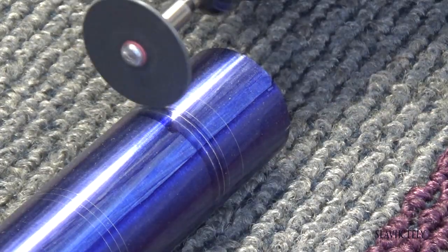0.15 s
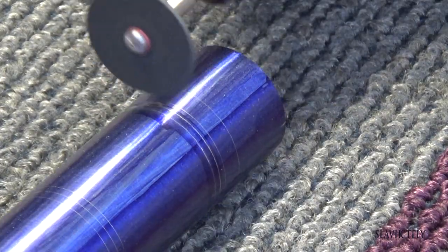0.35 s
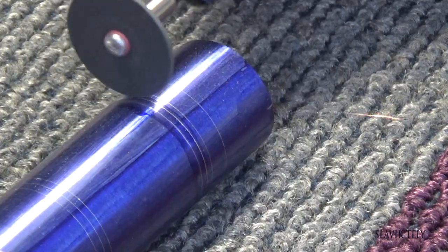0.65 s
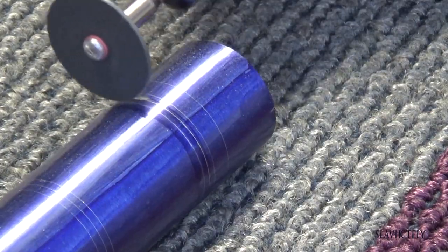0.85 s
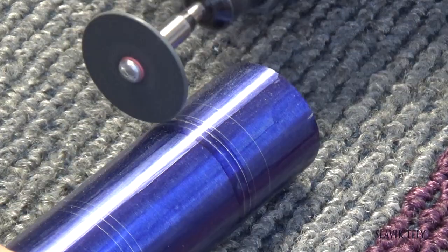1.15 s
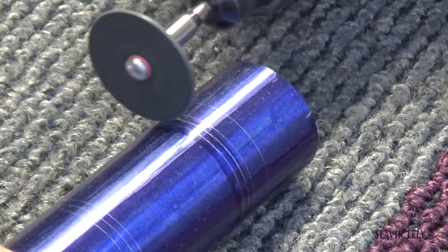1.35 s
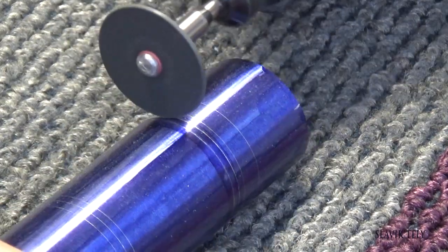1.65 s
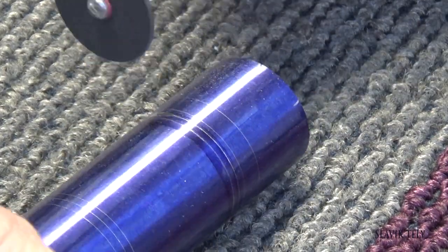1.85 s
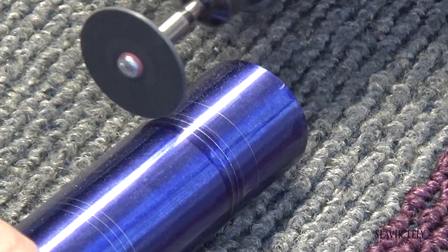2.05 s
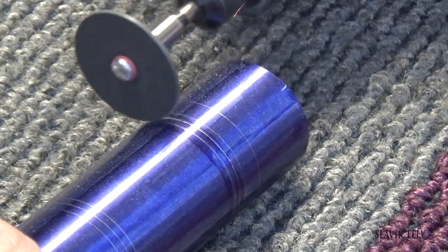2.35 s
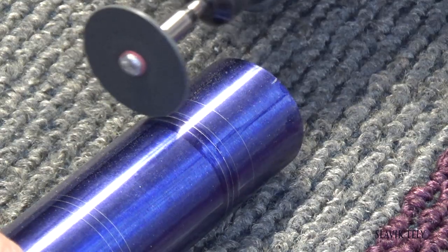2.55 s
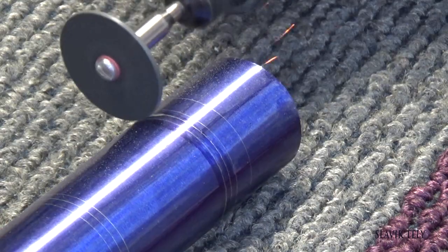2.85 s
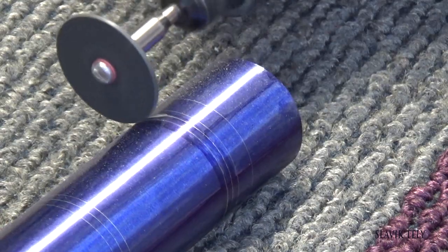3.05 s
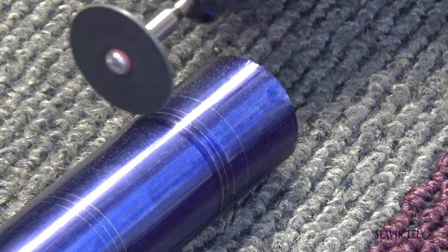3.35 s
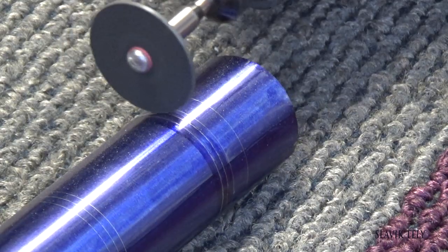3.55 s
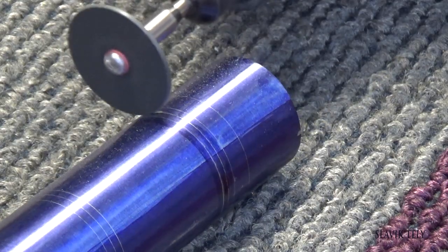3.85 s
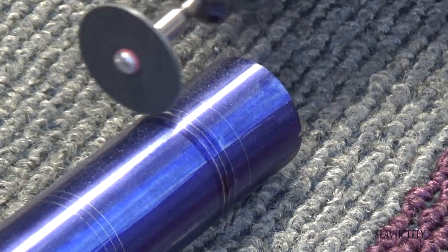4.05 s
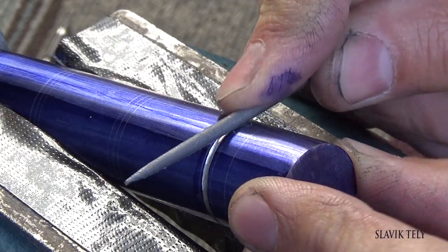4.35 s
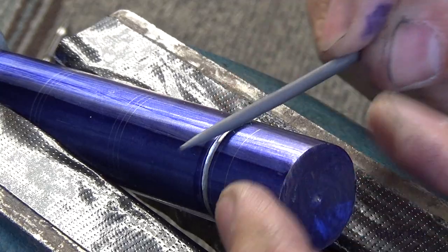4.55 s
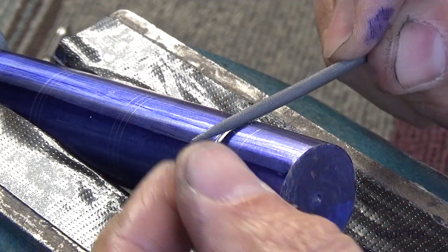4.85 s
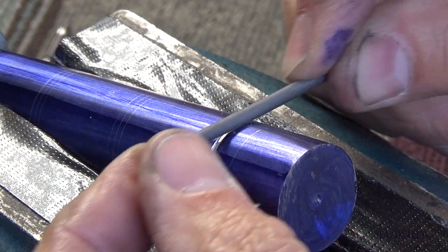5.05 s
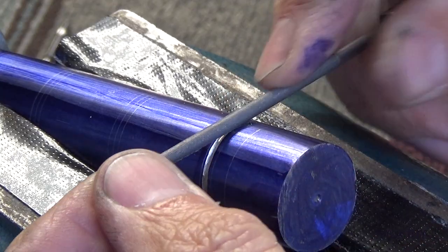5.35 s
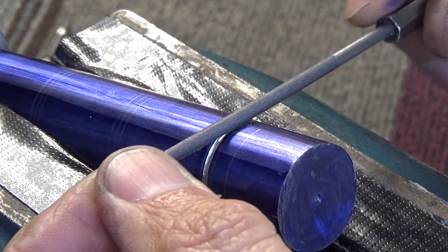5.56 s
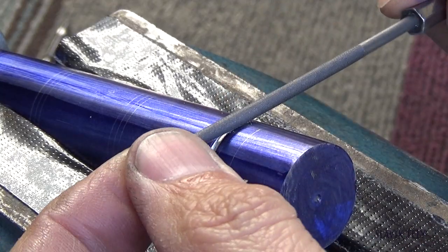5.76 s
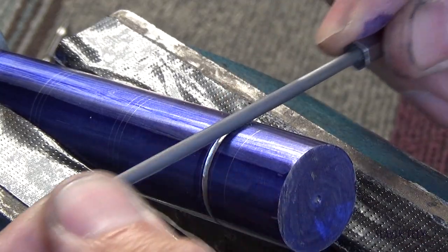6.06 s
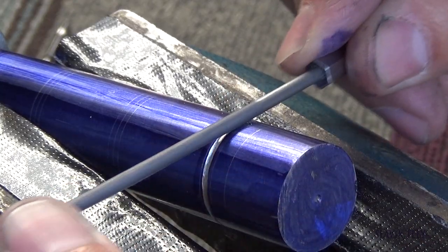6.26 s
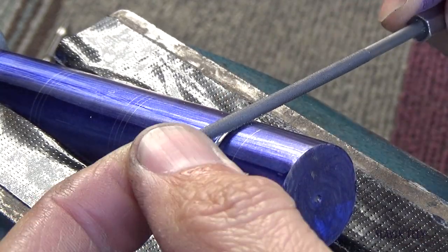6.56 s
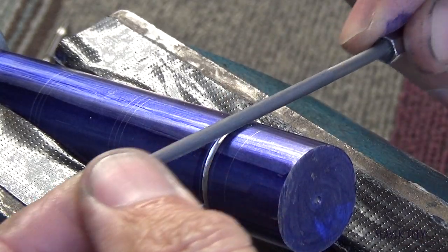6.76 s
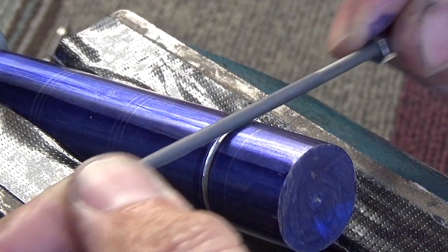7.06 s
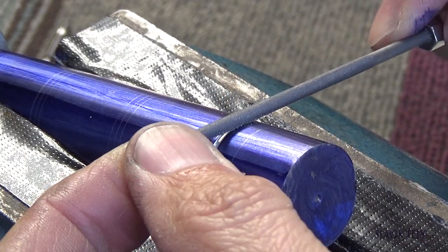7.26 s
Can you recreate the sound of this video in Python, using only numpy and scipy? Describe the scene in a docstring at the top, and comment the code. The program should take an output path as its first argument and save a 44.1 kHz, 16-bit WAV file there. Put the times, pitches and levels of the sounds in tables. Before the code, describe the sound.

Shrill, wavering motor whine with gritty disc grinding on steel, then a sudden cut to soft dry file scratches, bright metallic ticks and dull taps.

```python
"""Workshop, two benches: a small rotary tool cuts grooves in a steel bar, then a thin round file works the groove.
Tool: shaft orders and bearing tones follow a load-sagging shaft; the disc drives resonances once a turn, over hiss.
File: coloured noise scratches and snaps; taps mix a noise crack, a thud and decaying steel modes, over a rumble.
All dB levels are before a final port trim of +0.25 and -0.25 dB; spectra in dB per Hz are relative."""
import sys
import numpy as np
from scipy import signal
from scipy.fft import rfft, irfft
from scipy.io import wavfile
from scipy.ndimage import uniform_filter1d

SR = 44100
rng = np.random.default_rng(int(sys.argv[2]) if len(sys.argv) > 2 else 0)


def dump_mix(stems):
    """Bounce the given channels to the path in sys.argv[1] as a 16-bit WAV at rate SR."""
    frames = np.atleast_2d(stems).T  # one column per channel
    limited = np.clip(frames, -1, 1)  # hard clip at full scale
    pcm = np.round(limited * 32767).astype(np.int16)
    wavfile.write(sys.argv[1], SR, pcm)


N = 325899
TOOL_END_S = 4.205  # the tool bench ends, the file bench begins


def amp(db):
    """Turns dB into gain."""
    return np.exp(np.asarray(db) * (np.log(10) / 20))


def evened(x):
    """Scales to an rms of one."""
    return x / np.sqrt(np.mean(x ** 2) + 1e-20)


def read_spectrum(points, hz):
    """Reads a spectrum on a log-frequency axis."""
    point_hz, value = np.transpose(points)
    return np.interp(np.log(hz + 1), np.log(point_hz + 1), value)


def columns(rows, t):
    """Samples every column of a curve table at the times t."""
    time_s, *values = np.transpose(rows)
    return [np.interp(t, time_s, v) for v in values]


def spell(t, start_s, length_s, ramp_s):
    """Rises over ramp_s, holds, and fades over ramp_s."""
    to_edge_s = np.minimum(t - start_s, start_s + length_s - t)
    return np.sin(np.pi / 2 * np.clip(to_edge_s / ramp_s, 0, 1)) ** 2


def drift(n, rate_hz, step=1):
    """Random wander from one-pole smoothed knots (corner rate_hz), read every step samples."""
    knots_hz = 200
    knots = rng.standard_normal(int(n / SR * knots_hz) + 2)
    smooth = signal.lfilter([1], [1, -np.exp(-2 * np.pi * rate_hz / knots_hz)], knots)
    return np.interp(np.arange(0, n, step) / SR * knots_hz, np.arange(len(knots)), evened(smooth))


def resonate(x, hz, width_hz):
    """One complex-pole resonance, gain near one at hz."""
    r = np.exp(-np.pi * width_hz / SR)
    pole = r * np.exp(2j * np.pi * hz / SR)
    return 2 * signal.lfilter([1 - r], [1, -pole], x + 1e-18).real


def noise(n, spectrum, patchy_db):
    """Noise of a given colour with drifting patches in time and frequency, rms one."""
    frames, hz = n // 128 + 5, np.fft.rfftfreq(512, 1 / SR)
    real, imag, patches = rng.standard_normal((frames, 257, 3)).T
    patches = uniform_filter1d(patches, size=8, axis=0)
    patches = evened(uniform_filter1d(patches, size=10, axis=1))
    z = (real + 1j * imag) * amp(read_spectrum(spectrum, hz)[:, None] + patchy_db * patches)
    return evened(signal.istft(z, nperseg=512, noverlap=384)[1][:n])


# Shaft speed. Each row: time in seconds, shaft turns in Hz.
SHAFT_SPEED = [(0.0, 310.9), (0.25, 313.7), (0.36, 311.0), (0.62, 301.5), (0.72, 303.0), (1.1, 315.3),
               (1.2, 315.1), (1.32, 313.0), (1.56, 318.8), (1.8, 311.8), (1.92, 310.8), (2.4, 300.6),
               (2.52, 303.2), (2.7, 305.4), (3.0, 301.0), (3.24, 298.7), (3.55, 301.6), (3.72, 303.0),
               (3.84, 301.4), (4.08, 294.2), (4.15, 301.0), (4.19, 302.8)]


def shaft(t, chatter):
    """Integrates the load-sagging speed to turns; chatter jerks the shaft."""
    shaft_hz = columns(SHAFT_SPEED, t)[0]
    jerk_turns = .005 * chatter * evened(uniform_filter1d(drift(len(t), 30.), 400))
    return shaft_hz, np.cumsum(shaft_hz) / SR + jerk_turns


def tone(turns, db, shake):
    """A sine shaken in size and phase; start phases within 0.6 turn bunch the orders into a beat each turn."""
    n = len(turns)
    angle = 2 * np.pi * (turns + .6 * rng.random())
    size, phase = (evened(uniform_filter1d(drift(n, 60.), 260)) for _ in range(2))
    shaken = (1 + shake * size) * np.cos(angle) - shake * phase * np.sin(angle)
    return np.sqrt(2 / (1 + 2 * shake ** 2)) * amp(db) * shaken


# Body resonances lifting orders that pass through. Each row: centre in Hz, width in Hz, lift in dB.
BODY_RESONANCES = [(2515.6, 47, 19), (3890, 150, 12.5)]
# One order sings out as the hand turns the tool; the pitch picks the order.
# Each row: start in seconds, length in seconds, nominal pitch in Hz, surge level in dB rms.
ORDER_SURGES = [(.06, .15, 4375, -30), (0.1, 0.28, 2186, -37.5), (-0.5, 0.21, 2510, -33),
                (0.7, 0.064, 4020, -33), (0.95, 0.23, 3940, -32.5), (0.76, 0.36, 612, -51),
                (0.8, 0.26, 3680, -32.5), (0.5, 0.38, 3040, -39), (0.8, 0.25, 3070, -33.5),
                (0.8, .55, 3350, -44), (0.3, .25, 3980, -36.5), (.78, .2, 2770, -41), (0, 0.5, 5930, -41.5),
                (1.1, .4, 4440, -40.5), (1.9, .42, 2480, -33.5), (1.78, .3, 5910, -39),
                (2.15, 0.83, 3340, -41), (2.5, 0.45, 4840, -39.5), (2.5, .42, 4810, -39),
                (3.35, 0.74, 4820, -41), (3.78, .36, 5060, -43), (3, .25, 5350, -46),
                (3.75, 0.32, 5680, -44), (1.25, 0.19, 2510, -26), (1.362, .07, 3780, -33),
                (1.445, 0.41, 3800, -27), (1.55, 0.13, 3820, -25.5), (1.67, 0.15, 2505, -24),
                (1.8, 0.38, 2175, -33.5), (2, 0.26, 4660, -35), (1.8, .14, 3730, -28.5),
                (2.5, .25, 2105, -39), (2.43, 0.062, 2416, -33), (2, 0.32, 3030, -39.5),
                (2, 0.2, 3640, -35), (2.777, 0.33, 2420, -30.5), (2.85, .14, 3630, -28.5),
                (3, 0.8, 3010, -37), (3, 0.89, 900, -53), (3, 0.25, 4510, -34.5), (3.082, 0.21, 3590, -29),
                (3, 0.28, 3290, -36.5), (4, 0.24, 2410, -39), (3.5, .15, 2110, -39), (4, .1, 3930, -29.5),
                (4, 0.15, 3870, -26), (3.947, 0.15, 2360, -34), (4, 0.11, 2060, -37.5),
                (4.075, 0.06, 3850, -32), (4.09, 0.053, 3600, -32), (4, 0.22, 4470, -36.5),
                (4, 0.17, 4150, -40)]


def order_db(k, db, t, shaft_hz):
    """Level of one shaft order: wandering, lifted by the body, plus its surges."""
    step = 64
    wander = amp(2 * 3 * np.tanh(.7 * drift(len(t), 3., step)))  # power, within 3 dB
    u, turn_hz = t[::step], shaft_hz[::step]
    lift = sum(amp(2 * lift_db) / (1 + (2 * (k * turn_hz - hz) / width_hz) ** 2) ** 2
               for hz, width_hz, lift_db in BODY_RESONANCES)
    power = amp(2 * db) * (wander + lift * wander ** 0.21)
    for start_s, length_s, hz, surge_db in ORDER_SURGES:
        if round(hz / np.interp(start_s + length_s / 2, u, turn_hz)) == k:
            power = power + amp(2 * surge_db) * spell(u, start_s, length_s, 0.3 * length_s) ** 2
    return np.interp(t, u, 10 * np.log10(power))


# Shaft orders. Each entry: multiple of the shaft speed, base level in dB rms.
SHAFT_ORDERS = dict(zip((2, 3, 4, 5, 6, 7, 8, 9, 10, 11, 12, 13, 14, 15, 16, 17, 18, 19, 20, 21, 27),
                (-57, -58, -46, -53, -49, -44, -44, -47, -43, -43, -42, -44, -49, -44, -44, -51, -52, -49, -51, -46, -47)))
# The whine drops out briefly. Each entry: start in seconds.
WHINE_STUTTERS = [1.103, 1.146, 1.392, 1.44, 1.468, 1.498]
STUTTER_S, STUTTER_DB = 0.018, -10.5


def motor_whine(t, turns, shaft_hz, hum_db, chatter, whine_db):
    """Hum at shaft speed and its orders, the higher ones shaken more by chatter."""
    dips = sum(spell(t, start_s, STUTTER_S, STUTTER_S / 2) for start_s in WHINE_STUTTERS)
    whine_db = whine_db + STUTTER_DB * dips
    whine = tone(turns, hum_db, 0.015 * chatter)
    for k, db in SHAFT_ORDERS.items():
        whine += tone(k * turns, whine_db + order_db(k, db, t, shaft_hz), 0.06 * k * chatter)
    return whine


# Bearing tones. Each row: multiple of the shaft speed, base level in dB rms.
BEARING_TONES = [(7.63, -47), (8.396, -36.5), (8.81, -47), (14.52, -54), (16.4, -54)]


def bearings(turns):
    """Sines at non-integer multiples of the shaft, drifting slowly in level."""
    return sum(np.sqrt(2) * amp(db + 1.8 * drift(len(turns), 2.5)) * np.sin(2 * np.pi * k * turns)
               for k, db in BEARING_TONES)


# Disc resonances. Each row: centre in Hz, width of each of two passes in Hz, relative gain in dB.
DISC_MODES = [(6475, 470, 4.5), (6766, 216, 8.5), (7036, 290, 9), (7710, 550, 3.5), (8900, 790, -3.5),
              (10250, 320, -6), (12110, 340, -6), (13200, 420, -6)]
# Presses of the disc into the groove.
# Each row: start in seconds, length in seconds, bite at first in dB, bite at last in dB.
DISC_CUTS = [(-.02, 0.11, -38, -39), (.26, 0.43, -29.5, -30.5), (0.935, 0.22, -33.5, -30.5),
             (1.472, 0.29, -35, -32), (1.74, 0.69, -36, -28.5), (2.45, 0.43, -32, -28),
             (2.862, 0.31, -32.5, -38.5), (3.456, 0.41, -37, -40), (3.76, 0.29, -28.5, -45.5),
             (3.998, .12, -34, -30)]
GRAZE_DB, TOUCH_S = -41.5, 0.04  # bite between cuts; time to press in or lift off


def disc_bite(t, turns, chatter):
    """Blows and grit once a turn drive the disc's resonances; pressure sets the level."""
    n = len(t)
    press = amp(GRAZE_DB)
    for start_s, length_s, first_db, last_db in DISC_CUTS:
        cut_db = np.interp(t, (start_s, start_s + length_s), (first_db, last_db))
        press = press + spell(t, start_s, length_s, TOUCH_S) * amp(cut_db)
    grit_share = np.clip(0.24 + 0.42 * chatter, 0, 1)
    uneven_turns = turns + .003 * drift(n, 60.)
    # each overtone of the blow wanders in level at random
    blows = evened(sum(amp(3.76 * drift(n, 3.0)) * np.cos(2 * np.pi * k * uneven_turns)
                       for k in range(21, 46)))
    after_high_spot = 0.19 + np.exp(-(uneven_turns % 1) / 0.22)
    grit = evened(rng.standard_normal(n) * after_high_spot)
    drive = (1 - grit_share) * blows * amp(1.4 * drift(n, 8.7)) + grit_share * grit
    bite = 0
    for i, (hz, width_hz, db) in enumerate(DISC_MODES):
        mode = resonate(resonate(drive, hz, width_hz), hz, width_hz)
        bite = bite + (-1) ** i * amp(db) * mode  # alternating signs
    return press * evened(bite)


# Hiss colour. Each row: frequency in Hz, relative level in dB per Hz.
HISS_SPECTRUM = [(24, -62), (75, -31), (160, -16.5), (262, -17.5), (305, -43), (354, -22.5), (600, -19),
                 (733, -17), (1210, -6.5), (1720, -12.5), (2500, -1.5), (2840, -9), (3650, -3.5),
                 (4150, -6), (5500, -9), (6820, -8), (12500, -16.5), (14800, -25.5), (16000, -76)]
HISS_DB, CHATTER_RAISE_DB = -35.3, 4.1  # base level; raise per unit of chatter


def fan_and_grinding_hiss(turns, chatter):
    """Coloured noise pulsing once a turn; chatter raises it."""
    pulse = 1 + 0.31 * np.cos(2 * np.pi * turns)
    return amp(HISS_DB + CHATTER_RAISE_DB * chatter) * pulse * noise(len(turns), HISS_SPECTRUM, patchy_db=2.0)


# Narrow casing rings. Each row: centre in Hz, width in Hz, base level in dB rms.
CASING_RINGS = [(2494, 4.1, -45)]


def casing(n):
    """Noise keeps narrow resonances ringing at a drifting level."""
    return sum(amp(db + 3.0 * drift(n, 0.93)) * evened(resonate(rng.standard_normal(n), hz, width_hz))
               for hz, width_hz, db in CASING_RINGS)


# Grip on the tool. Each row: time in seconds, hum at shaft speed in dB rms, chatter (0 none, about 1 strong),
# whine offset in dB.
TOOL_GRIP = [(0, -49, 0.2, -1), (.25, -64.5, 0.4, 1.3), (.5, -56, 0, -1.7), (.73, -47, 0.3, .1),
             (.92, -52, .8, 0), (1.1, -55.5, 0.3, -0.6), (1.35, -54, 0.1, 0.9), (1.55, -55, 0.7, 0.3),
             (1.9, -56, 0.33, -1.9), (2.38, -59, .8, 2.5), (2.52, -52.5, 0.4, 2), (2.68, -58, 0.85, 1),
             (2.9, -49.5, 0.64, 0.9), (3.24, -51.5, 0.3, 0.2), (3.5, -53, 0.45, 1.5), (3.62, -58, 1.2, 2),
             (3.76, -63, .9, 2), (3.96, -75.5, 0.02, -0.4), (4.12, -58, 0.7, 0.7), (4.19, -50, 0.5, -9)]
FADE_S = 0.013


def rotary_tool():
    """Motor and bearing tones, disc bite, hiss and casing rings, summed; fades at the end."""
    n = round(TOOL_END_S * SR)
    t = np.arange(n) / SR
    hum_db, chatter, whine_db = columns(TOOL_GRIP, t)
    shaft_hz, turns = shaft(t, chatter)
    out = motor_whine(t, turns, shaft_hz, hum_db, chatter, whine_db)
    out += bearings(turns)
    out += disc_bite(t, turns, chatter)
    out += fan_and_grinding_hiss(turns, chatter)
    out += casing(n)
    return np.pad(out * np.minimum((t[-1] - t) / FADE_S, 1), (0, N - n))


# Scratch body colour. Each row: frequency in Hz, relative level in dB per Hz.
SCRATCH_SPECTRUM = [(180, -31.5), (300, 3.5), (366, -8.5), (442, -6), (594, -3), (1370, 0), (1630, -4.5),
                    (2350, -7.5), (5000, -47), (6500, -49), (11000, -120)]
# Bright edge colour. Each row: frequency in Hz, relative level in dB per Hz.
EDGE_SPECTRUM = [(1470, -14), (2500, 2.5), (7020, -8.5), (13500, -24.5), (16000, -32)]
# File strokes. Each row: start in seconds, length in seconds, scratch in dB, bright edge in dB.
FILE_STROKES = [(4.167, 0.22, -38.5, -47.5), (4.47, 0.17, -47, -48.5), (4.772, 0.057, -33.5, -39.5),
                (4.869, 0.031, -38, -49), (4.938, 0.073, -60, -41), (5.06, 0.32, -41.5, -51),
                (5.343, 0.26, -43.5, -53), (5.902, 0.43, -41.5, -51), (6.77, 0.21, -42.5, -68),
                (6.903, 0.42, -42, -52)]
REST_DB, REST_EDGE_DB = -41.5, -48.5  # file sliding lightly, also under the strokes
EASE = 0.18  # share of a stroke spent rising, and again fading
SNAPS_PER_S, SNAP_DECAY_S = 14., 0.0051


def file_scratch():
    """Teeth scratch the groove as two noise bands and snap at random."""
    start = round(TOOL_END_S * SR)
    n = N - start
    t = TOOL_END_S + np.arange(n) / SR
    shapes = [spell(t, start_s, length_s, EASE * length_s) for start_s, length_s, *_ in FILE_STROKES]
    stroke_power = np.array(shapes).T ** 2 @ amp(2 * np.array(FILE_STROKES)[:, 2:])
    body_gain, edge_gain = np.sqrt(amp([2 * REST_DB, 2 * REST_EDGE_DB]) + stroke_power).T
    snaps = amp(4.4 * np.minimum(rng.exponential(1, n), 3)) * (rng.random(n) < SNAPS_PER_S / SR)
    snapping = 1.02 * signal.lfilter([1], [1, -np.exp(-1 / (SNAP_DECAY_S * SR))], snaps)
    body = body_gain * amp(1.6 * drift(n, 20.0)) * noise(n, SCRATCH_SPECTRUM, patchy_db=0.7)
    edge = (edge_gain + amp(REST_EDGE_DB) * snapping) * noise(n, EDGE_SPECTRUM, patchy_db=1.5)
    return np.pad(body + edge, (start, 0))


# Modes of bar and file. Each row: frequency in Hz, factor on the tap's base T60.
STEEL_MODES = [(420, 2.1), (620, 2.8), (900, 0.55), (1157, 2.1), (1310, 1.7), (1385, 2.1), (1800, 0.21),
               (2140, 0.67), (2466, 1.5), (3050, 1.3), (3700, 0.67), (4300, 1.06), (4520, 0.44),
               (5050, 0.093), (5670, 0.17), (6300, 0.98), (7300, 0.41)]


def tap(centre_hz, octaves, t60_s):
    """Noise crack, low thud, and steel modes ringing near the tap's own pitch."""
    n = 6144
    t, hz = np.arange(n) / SR, np.fft.rfftfreq(n, 1 / SR)
    modes_hz, ring = np.transpose(STEEL_MODES)[:, :, None]
    phase, level = rng.random((2, len(STEEL_MODES), 1))
    near = np.exp(-.5 * (np.log2(modes_hz / centre_hz) / octaves) ** 2)
    decay = amp(-6. * level - 60 * t / (ring * t60_s))
    rings = (near * decay * np.sin(2 * np.pi * (modes_hz * t + phase))).sum(0)
    colour = np.exp(-.5 * (np.log2((hz + 1) / centre_hz) / (1.46 * octaves)) ** 2)
    colour = colour / (1 + (hz / 11500) ** 4)
    burst = evened(irfft(rfft(rng.standard_normal(n)) * colour))
    # crack, then rattle and bench echoes
    crack = burst * (0.58 * amp(-60 * t / (0.45 * t60_s)) + 0.26 * amp(-60 * t / (3.37 * t60_s)))
    # dull taps shake the bench
    thud = evened(resonate(rng.standard_normal(n), 527.0, 260.0)) * amp(-60 * t / (2 * t60_s))
    thud = thud * (607.0 / centre_hz) ** 2
    mix = crack + thud + 0.95 * rings / np.sqrt((near ** 2).sum())
    return 0.52 * mix * np.minimum(t / 0.0001, 1)


# Dull knocks of bar and vice.
# Each row: start in seconds, relative level in dB, centre in Hz, spread in octaves, base T60 in seconds.
BAR_KNOCKS = [(4.542, -21.5, 1990, 0.63, 0.05), (4.954, -26, 1540, 0.33, 0.077),
              (4.984, -25.5, 1470, 0.33, 0.041), (5.181, -24, 1500, 0.62, 0.07),
              (5.724, -21, 1800, 0.29, 0.12), (5.847, -27.5, 560, 1.2, 0.056),
              (5.928, -19.5, 1350, 0.72, 0.059), (5.935, -18, 950, 0.62, 0.14),
              (6.13, -17.5, 2360, 0.42, 0.079), (6.159, -27, 2400, .4, .04), (6.198, -27.5, 1000, .5, .08),
              (6.397, -10, 1240, 0.48, 0.081), (6.42, -18, 1300, .35, .07), (6.994, -29, 1400, 0.37, 0.041),
              (7.108, -26.5, 2200, .5, .05)]
# Bright ticks of the file. Each row: start in seconds, relative level in dB, centre in Hz, spread in octaves.
FILE_TICKS = [(4.273, -29.5, 4230, 0.6), (4.5873, -29.5, 3640, 1), (4.733, -25, 4330, 0.45),
              (4.8103, -22.5, 3970, 1), (4.638, -32.5, 5300, .3), (4.837, -31, 2800, 0.44),
              (4.873, -23, 2800, .8), (4.9277, -14, 3620, 0.6), (5.1384, -16.5, 4000, 0.39),
              (5.18, -25.5, 3450, 0.95), (5.324, -21, 3730, 0.76), (5.3816, -29.5, 6200, 0.39),
              (5.413, -31, 3640, 0.32), (5.6358, -19.5, 3960, 0.37), (5.651, -25.5, 3660, 1),
              (5.83, -18.5, 3860, 0.51), (5.988, -34, 3750, 0.88), (6.0644, -31, 4040, 0.37),
              (6.3968, -11, 4000, 0.7), (6.529, -28, 3820, 1), (6.636, -24.5, 3380, 0.68),
              (6.7057, -31.5, 5840, 0.41), (6.8895, -24.5, 3640, 0.66), (6.9358, -26.5, 4100, 0.36),
              (7.0604, -16, 5150, 0.41), (7.23, -11, 4340, 0.4)]
TICK_T60_S = 0.046


def knocks_and_ticks():
    """Places each tap of bar, vice and file."""
    out = np.zeros(N + SR)
    for start_s, db, centre_hz, octaves, t60_s in BAR_KNOCKS + [(*tick, TICK_T60_S) for tick in FILE_TICKS]:
        hit = tap(centre_hz, octaves, t60_s)
        out[round(start_s * SR):][:len(hit)] += amp(db) * hit
    return out[:N]


# Rumble colour. Each row: frequency in Hz, relative level in dB per Hz.
RUMBLE_SPECTRUM = [(18, -45), (30, -8), (69, -3), (124, 5.5), (313, -3.5), (600, -9), (780, -27),
                   (1320, -120)]
RUMBLE_DB = -50


def workshop_rumble():
    """Low coloured noise around the second bench."""
    n = N - round(TOOL_END_S * SR)
    hz = np.fft.rfftfreq(n, 1 / SR)
    colour = amp(read_spectrum(RUMBLE_SPECTRUM, hz))
    rumble = evened(irfft(rfft(rng.standard_normal(n)) * colour, n))
    return np.pad(amp(RUMBLE_DB) * rumble, (N - n, 0))


# Stereo width at the tool bench. Each row: frequency in Hz, side minus mid in dB.
TOOL_SIDE = [(60, -15), (110, -14), (200, -17), (380, -31), (700, -17.5), (1290, -35), (2380, -21),
             (4400, -11), (8120, -8.5), (15000, 0)]
# Stereo width at the file bench. Each row: frequency in Hz, side minus mid in dB.
FILING_SIDE = [(60, -9), (110, -9), (200, -14), (380, -13.5), (700, -15.5), (1290, -15.5), (2380, -7.5),
               (4400, -3), (8120, 1.5), (15000, 1)]


def two_ports(x):
    """Both ports share a mid signal; a randomly shifting side signal widens it, most in the treble."""
    hz, t, z = signal.stft(x, SR, nperseg=512)
    real, imag = rng.standard_normal((len(t), len(hz), 2)).T
    shift = uniform_filter1d(real + 1j * imag, size=3, axis=0)
    shift = uniform_filter1d(shift, size=12, axis=1)
    shift = shift / np.sqrt(np.mean(abs(shift) ** 2))
    tool_db, file_db = (read_spectrum(rows, hz)[:, None] for rows in (TOOL_SIDE, FILING_SIDE))
    side_db = np.where(t < TOOL_END_S, tool_db, file_db)
    side = signal.istft(z * shift * amp(side_db), SR, nperseg=512)[1][:N]
    trim_db = [[.25], [-.25]]  # first port up, second down
    return np.array([x + side, x - side]) * amp(trim_db)


def scene():
    """The cut, then the filing."""
    return two_ports(rotary_tool() + file_scratch() + knocks_and_ticks() + workshop_rumble())


def record(dry):
    """Band limit: linear-phase low-pass."""
    cutoff_hz = 16300
    lowpass = signal.firwin(511, cutoff_hz, window=("kaiser", 9), fs=SR)
    return signal.oaconvolve(dry, lowpass[None], "same")


dry = scene()
out = record(dry)
dump_mix(out)
```